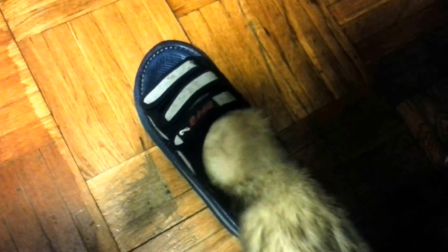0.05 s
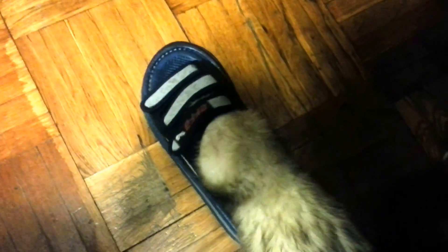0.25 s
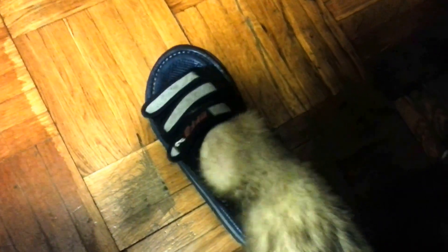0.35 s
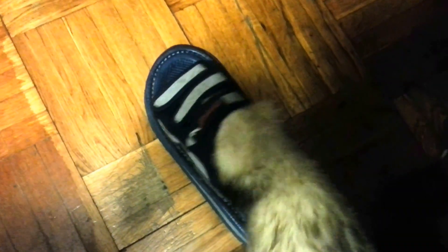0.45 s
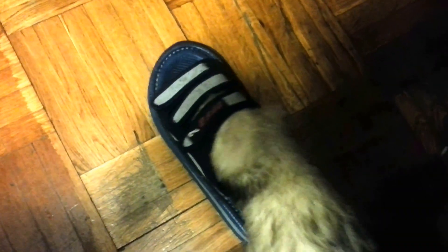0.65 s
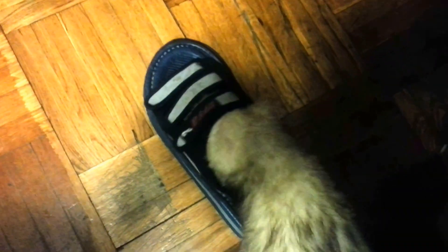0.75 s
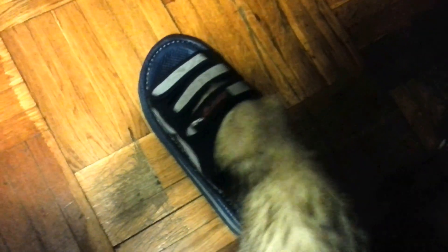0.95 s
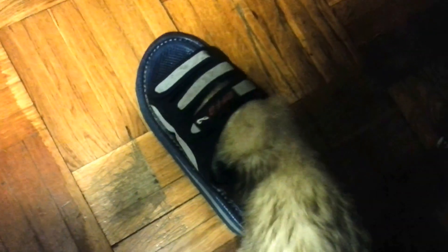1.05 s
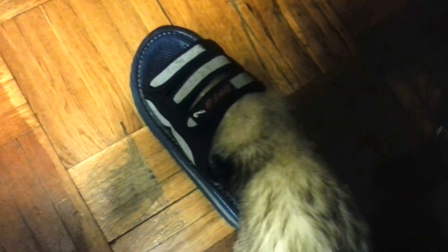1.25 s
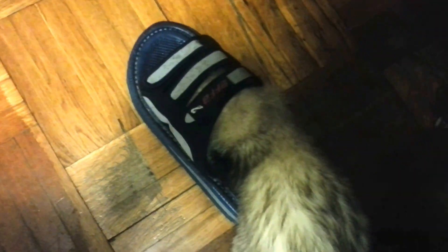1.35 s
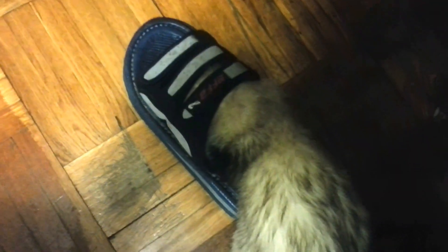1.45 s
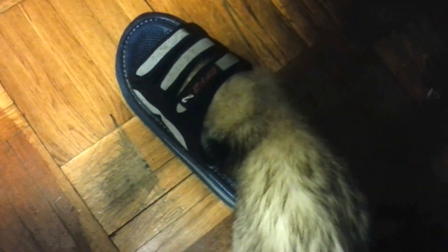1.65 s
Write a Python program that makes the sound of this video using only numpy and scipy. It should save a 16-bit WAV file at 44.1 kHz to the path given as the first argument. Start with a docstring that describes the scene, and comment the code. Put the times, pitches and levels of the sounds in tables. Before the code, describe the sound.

A ferret scratches inside a small shoe in quick, scraping strokes.

```python
"""A ferret digs inside a small shoe on a wooden floor, heard from close by.
In each paw stroke the claws snag brightly on the lining, the scrape sounds through the hollow
of the shoe, and the paw rubs dully on the sole. Fur brushes along, and knocks leave the shoe ringing.
One last faint rub follows as the animal settles. A small, quiet room echoes briefly and hums."""
import sys
import numpy as np
from scipy import signal
from scipy.fft import rfft, irfft
from scipy.io import wavfile

SR = 44100
rng = np.random.default_rng(int(sys.argv[2]) if len(sys.argv) > 2 else 0)


def to_wav(sig):
    """Store sig (one row per channel, or 1-D mono) as 16-bit WAV at the path in sys.argv[1].

    Samples outside -1..1 are clipped; the rate is SR.
    """
    pcm = np.clip(np.atleast_2d(sig), -1, 1) * 32767
    pcm = np.round(pcm).astype(np.int16)
    wavfile.write(sys.argv[1], SR, pcm.T)  # frames by channels


N = 74970

# Paw strokes (start [s], length [s], claw hiss [dB], shoe hollow [dB], sole rub [dB],
# change of the hiss over the stroke [dB], starting pitch of the rub [Hz])
PAW_STROKES = [(-0.03, 0.03, -41.5, -30.5, -37, 1.5, 1180), (0.02, 0.11, -54, -52, -58, -5, 1110),
               (0.08, 0.053, -51, -45, -56, 1, 1110), (0.162, 0.057, -46.5, -39, -41, 10, 1070),
               (0.203, 0.026, -26.5, -32.5, -21.5, -1, 1090), (0.228, 0.035, -29.5, -25.5, -24, -6.5, 936),
               (0.309, 0.033, -30, -30.5, -57, -1.5, 1220), (0.343, 0.01, -32, -20.5, -48, 7, 1210),
               (0.359, 0.08, -21.5, -26, -46, -8, 1200), (0.435, 0.029, -36, -42, -30.5, -19, 1195),
               (0.48, 0.013, -28.5, -30, -55.5, 7, 1200), (0.486, 0.11, -31.5, -35.5, -34, -2.5, 1160),
               (0.581, 0.032, -36.5, -30.5, -34, -7.5, 1140), (0.706, 0.053, -22.5, -31, -51, -8.5, 1240),
               (0.757, 0.037, -28.5, -26, -32.5, -3, 1225), (0.786, 0.011, -32.5, -22, -25, -5.5, 970),
               (0.875, 0.053, -44.5, -40.5, -68, -5, 1110), (0.995, 0.083, -42, -38.5, -50.5, -7, 1110)]
def scraping(attack_s=0.005, release_s=0.013, hollow_fade_db=-8, sole_swell_db=1):
    """Each stroke is a stream of tiny slips. The rub drops in pitch as the paw sinks towards the sole."""
    t, power, rub_hz = np.arange(N) / SR, np.zeros((3, N)), np.zeros(N)
    for start, length, claw_db, hollow_db, sole_db, change_db, hz in PAW_STROKES:
        progress = np.clip((t - start) / length, 0, 1)
        fade_in = np.clip((t - start) / attack_s, 0, 1)
        fade_out = np.exp(-np.maximum(t - start - length, 0) / release_s)
        levels_db = [claw_db + change_db * progress,
                     hollow_db + hollow_fade_db * progress,
                     sole_db + sole_swell_db * (progress - 1)]
        power += (fade_in * fade_out * amp(levels_db)) ** 2
        rub_hz = np.where(t >= start, hz * (1 - 0.085 * progress), rub_hz)
    claw, hollow, sole = [np.sqrt(p) * tiny_slips() for p in power]
    rub = amp(-10) * sole + resonate(sole, rub_hz, width_hz=148)
    strength = np.sqrt(power.sum(0))
    fur = amp(-37) * strength ** 0.45 * rng.standard_normal(N)  # follows the strokes only weakly
    return claw, hollow, rub, fur


# Claws catching and letting go (time [s], relative level [dB], claw level above shoe hollow [dB])
CLAW_SNAGS = [(0.1622, -19, -3.5), (0.1780, -21, 10), (0.1989, -16, -5), (0.2066, -15, 1),
              (0.2170, -6.5, -9), (0.2247, -8.5, -24), (0.233, -9.5, -14), (0.2907, -18, 10),
              (0.3087, -19, -7), (0.3186, -9, 16), (0.3326, -9, 31), (0.3399, -5.5, 9), (0.3452, 0, 6),
              (0.3629, -5.5, 5), (0.3728, -27, 8), (0.3815, -7.5, 30.5), (0.4110, -18.5, -6),
              (0.4216, -10, 4.5), (0.4364, -10, -35), (0.4796, -16, 10), (0.4927, -5, 6),
              (0.4992, -10.5, -15), (0.5197, -7.5, -1), (0.533, -11, 2), (0.5367, -14, 5), (0.5471, -9, -3),
              (0.5569, -11.5, 1.5), (0.5659, -12.5, 6.5), (0.5734, -18, -1.5), (0.5798, -12.5, -6),
              (0.6005, -16.5, -1), (0.6563, -17, 13), (0.6695, -4.5, 16.5), (0.6937, -7, 8),
              (0.7026, 1.5, 57), (0.7146, -8.5, 5), (0.7273, -6.5, 12), (0.7375, -8, 7),
              (0.7919, -17.5, -35), (0.8821, -38, 1), (0.9328, -29.5, -17), (0.9620, -23, -7.5),
              (0.9913, -23, -1), (0.9977, -28, -4), (1.0068, -18.5, -3), (1.0159, -18.5, -4),
              (1.0207, -20, 16), (1.0252, -22.5, 0), (1.0561, -22.5, -2), (1.0666, -23, -5),
              (1.0953, -35, -3)]
def snagging(boost_db=7, chatter_db=-3.5, chatter_s=0.00045, size=400):
    """A snag is one hard slip and a short chatter, shared between the claw and the shoe's hollow."""
    claw, hollow, t = np.zeros(N), np.zeros(N), np.arange(size) / SR
    soften = signal.butter(3, 6050, fs=SR)  # a slip takes a moment, so it is duller than the hiss
    for start, db, bright_db in CLAW_SNAGS:
        slip = rng.standard_normal(size) * t * np.exp(-t / chatter_s)
        slip *= amp(chatter_db) / np.linalg.norm(slip)
        slip[0] += 1  # the click before the chatter
        slip = signal.lfilter(*soften, slip)
        slip *= amp(db + boost_db) / np.hypot(1, amp(bright_db)) / np.linalg.norm(slip)
        add(claw, start, slip * amp(bright_db))
        add(hollow, start, slip)
    return claw, hollow


# Tone of each part: how strong its lows and highs are (frequency [Hz], relative level [dB])
CLAW_TONE = [(30, -69), (200, -20), (1000, -29), (2300, -11), (3000, -0.5), (3700, 2), (4300, 2),
             (5200, -0.5), (6200, -18), (7200, -23.5), (8800, -20.5), (10500, -53), (15000, -94)]
HOLLOW_TONE = [(30, -82.5), (150, -38.5), (400, -18.5), (1200, -18.5), (1650, -0.5), (2100, 5),
               (2700, -3.5), (4000, -20), (5300, -15.5), (6400, -28), (9000, -44.5), (11000, -33),
               (15000, -107)]
SOLE_TONE = [(40, -56), (130, -35), (250, -13.5), (420, -11.5), (560, -1.5), (850, 5.5), (1150, 5),
             (1600, 5.5), (3000, -17.5), (6000, -13), (15000, -72)]
FUR_TONE = [(1500, -22), (5500, 14.5), (7000, 10.5), (8700, 16.5), (10500, 5), (15000, -75)]
# Where each part is heard (left minus right [dB], how alike the two ears are [0-1])
CLAW_PLACE, HOLLOW_PLACE, SOLE_PLACE, FUR_PLACE = (-15, 0.1), (6.9, 0.54), (0, 0.9), (-2.6, 0.067)
def digging():
    """Scrapes and snags sound through bright claws, the hollow shoe and the dull sole, with fur hiss."""
    claw, hollow, rub, fur = scraping()
    claw_snags, hollow_snags = snagging()
    return (radiate(claw + claw_snags, CLAW_TONE, CLAW_PLACE)
            + radiate(hollow + hollow_snags, HOLLOW_TONE, HOLLOW_PLACE)
            + radiate(rub, SOLE_TONE, SOLE_PLACE)
            + radiate(fur, FUR_TONE, FUR_PLACE))


# The paw hitting the sole (time [s], relative level [dB])
PAW_KNOCKS = [(0.2181, -23.5), (0.2343, -28), (0.264, -24.5), (0.2680, -23), (0.2752, -22), (0.4576, -16.5),
              (0.4638, -18), (0.6081, -25), (0.7964, -16), (0.8035, -9.5)]
# Tone of one knock (frequency [Hz], relative level [dB])
KNOCK_TONE = [(40, -50), (150, -30.5), (300, -6.5), (410, 4), (560, -1.5), (820, 5), (1150, 1.5),
              (1700, -0.5), (3000, -8.5), (6000, -34), (15000, -62)]
# Notes the knocked shoe rings at (frequency [Hz], relative level [dB], time to fade by 60 dB [s])
SHOE_NOTES = [(397.6, -44.5, 0.25), (789, -44, 0.25), (1120, -42, 0.072)]
def knocking(boost_db=12, rise_s=0.0011, size=8000):
    """Short, dull blows on the sole leave the shoe ringing."""
    blows, t = np.zeros(N), np.arange(size) / SR
    for start, db in PAW_KNOCKS:
        add(blows, start, amp([db + boost_db]))
    ringing = sum(amp(db) * die_away(t, fade_s) * np.cos(2 * np.pi * hz * t)
                  for hz, db, fade_s in SHOE_NOTES)
    ringing *= np.minimum(t / rise_s, 1)
    return radiate(blows, KNOCK_TONE, SOLE_PLACE) + signal.fftconvolve(blows, ringing)[:N]


# Tone of the last rub (frequency [Hz], relative level [dB])
SETTLING_TONE = [(300, -32), (1300, -11), (1900, 1.5), (2300, -2), (2700, 4), (3400, -3), (4200, -23),
                 (15000, -35)]
def settling(start_s=1.294, length_s=0.17, level_db=-59.5):
    """A faint rub swells and fades as the animal settles."""
    progress = np.clip((np.arange(N) / SR - start_s) / length_s, 0, 1)
    rub = amp(level_db) * np.sin(np.pi * progress) * tiny_slips()
    return radiate(rub, SETTLING_TONE, HOLLOW_PLACE)


# How long the room rings (frequency [Hz], time to fade by 60 dB [s])
ECHO_TIMES = [(150, 0.26), (500, 0.29), (2000, 0.3), (5000, 0.31), (12000, 0.26)]
def room_echo(sound, level_db=-10.5, rise_s=0.0093, size=256):
    """The room returns a soft wash of echoes in which each frequency dies at its own speed."""
    hz, t, bands = signal.stft(rng.standard_normal((2, SR // 2)), SR, nperseg=size)
    bands = bands * die_away(t, look_up(ECHO_TIMES, hz)[:, None])
    tail = signal.istft(bands, SR, nperseg=size)[1]
    tail *= np.minimum(np.arange(tail.shape[1]) / SR / rise_s, 1)
    tail /= np.linalg.norm(tail, axis=1, keepdims=True)
    blended = sound + 0.59 * sound[::-1]  # each side also reaches the other ear
    return amp(level_db) * signal.fftconvolve(blended, tail, axes=1)[:, :N]


# Tone of the quiet room (frequency [Hz], relative level [dB])
HUM_TONE = [(15, -37.5), (25, -23.5), (167, -5.5), (309, -4.5), (354, -6), (558, -9), (729, -6), (927, -8),
            (1240, -9), (1910, -13), (5280, -21), (6540, -23), (13500, -20.5), (15000, -12.5)]
# Spread of the hum (frequency [Hz], how alike the two ears are [0-1])
HUM_LIKENESS = [(50, 0), (200, 0.78), (700, 0.35), (2000, 0), (10000, 0.07)]
def room_hum(level_db=-49.5):
    """Steady noise makes the room's low hum and faint hiss."""
    hz = np.fft.rfftfreq(N, 1 / SR)
    left, other = rfft(rng.standard_normal((2, N)))
    alike = look_up(HUM_LIKENESS, hz)
    right = alike * left + np.sqrt(1 - alike ** 2) * other
    spectrum = np.array([left, right]) * amp(look_up(HUM_TONE, hz))
    return amp(level_db) * unit(irfft(spectrum, N))


def tiny_slips(per_second=2000, spread_db=3):
    """Rubbing surfaces catch and slip, making a dense crackle of uneven clicks."""
    chance, sign = rng.random((2, N))
    sizes = amp(spread_db * np.minimum(rng.exponential(1, N), 3))
    return unit(sizes * np.sign(sign - .5) * (chance < per_second / SR))


def resonate(sound, hz, width_hz):
    """Lets through a narrow band of the sound around the moving pitch hz."""
    turn = np.exp(2j * np.pi * np.cumsum(hz) / SR)
    feedback = np.exp(-np.pi * width_hz / SR)
    return 2 * (turn * signal.lfilter([1 - feedback], [1, -feedback], sound / turn + 1e-18)).real


def toned_click(tone, size, suddenness=0.62):
    """One click with the given tone. Suddenness 1 starts sharply; 0 swells as slowly as it dies."""
    hz = abs(np.fft.fftfreq(size, 1 / SR))
    log_gain = np.log(amp(look_up(tone, hz)))
    phase = -suddenness * signal.hilbert(log_gain).imag
    click = np.fft.fftshift(np.fft.ifft(np.exp(log_gain + 1j * phase)).real)
    return click / np.linalg.norm(click)


def radiate(sound, tone, place, bounce_db=-7, bounce_s=0.0047, size=2048):
    """Gives a sound its tone, its place between the ears and quick bounces off shoe and floor."""
    side_db, likeness = place
    t = np.arange(size) / SR
    bounces = rng.standard_normal((2, size)) * np.exp(-t / bounce_s) * (t > .001)
    bounces *= amp(bounce_db) / np.linalg.norm(bounces, axis=1, keepdims=True)
    pan = unit(amp([side_db / 2, -side_db / 2]))
    click = toned_click(tone, size)
    right = (signal.hilbert(click) * np.exp(1j * np.arccos(likeness))).real  # makes the ears less alike
    paths = signal.fftconvolve(click[None], bounces, axes=1) / np.sqrt(2)
    paths[:, :size] += np.array([click, right]) * pan[:, None]
    return signal.fftconvolve(sound[None], paths, axes=1)[:, size // 2:][:, :N]


def amp(db):
    """Turns decibels into a volume factor."""
    return 10 ** (np.asarray(db) / 20)


def unit(x):
    """Scales to an average (rms) level of 1."""
    return x / np.sqrt(np.mean(x ** 2) + 1e-20)


def die_away(t, fade_s):
    """A fade that drops 60 dB in fade_s seconds."""
    return np.exp(-np.log(1000) * t / fade_s)


def look_up(table, hz):
    """Reads between a table's rows, with octaves evenly spaced."""
    row_hz, values = np.transpose(table)
    return np.interp(np.log(hz + 1), np.log(row_hz + 1), values)


def add(track, start_s, sound):
    """Adds a sound into a track at the given time."""
    part = track[max(round(start_s * SR), 0):][:len(sound)]
    part += sound[:len(part)]


def scene():
    """The ferret in the shoe, its echo and the quiet room behind it."""
    shoe = digging() + knocking() + settling()
    return shoe + room_echo(shoe) + room_hum()


def record(dry, cutoff_hz=14650):
    """Flattens any peak that is too loud, then removes the highest treble."""
    low_pass = signal.firwin(255, cutoff_hz, window=("kaiser", 8), fs=SR)
    return signal.oaconvolve(np.clip(dry, -1, 1), low_pass[None], "same")


dry = scene()
out = record(dry)
to_wav(out)
```